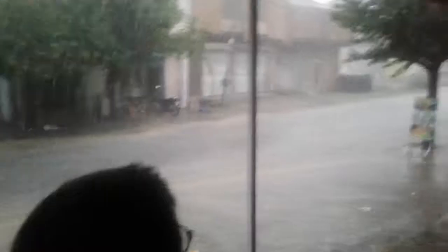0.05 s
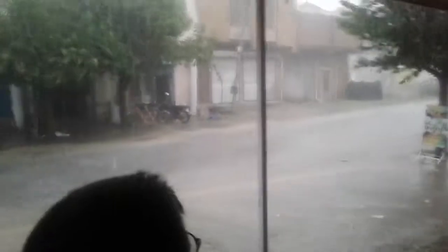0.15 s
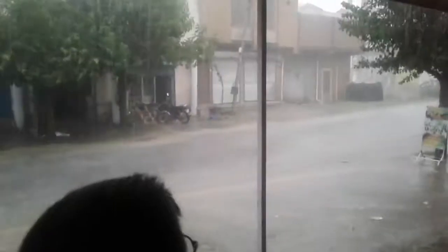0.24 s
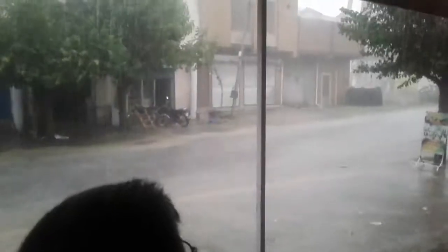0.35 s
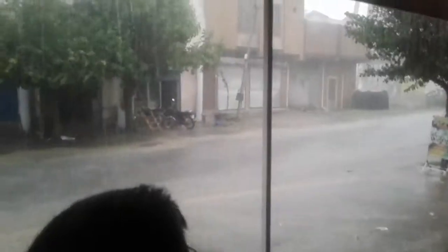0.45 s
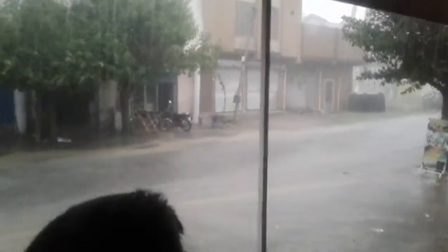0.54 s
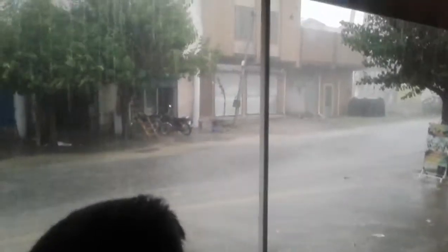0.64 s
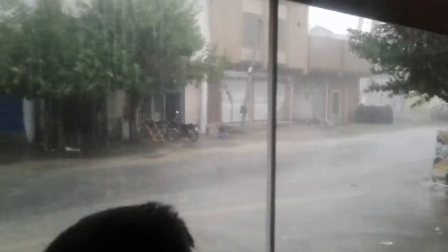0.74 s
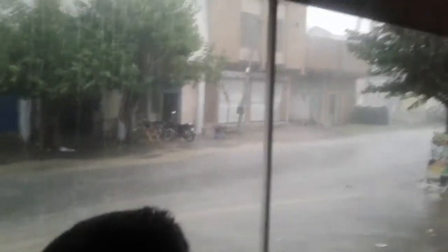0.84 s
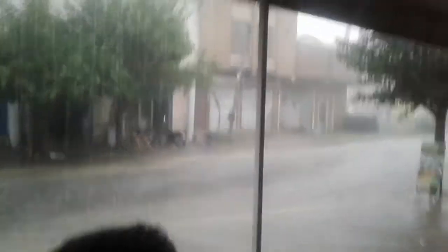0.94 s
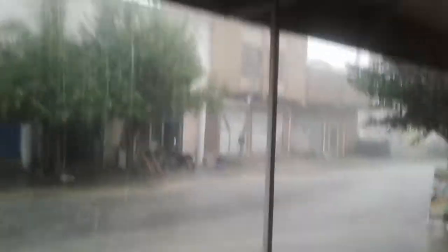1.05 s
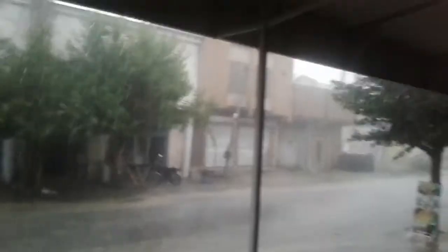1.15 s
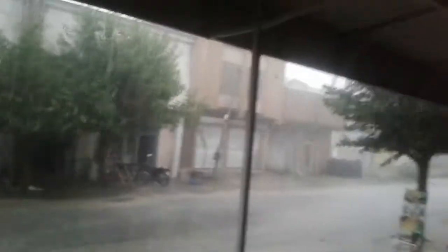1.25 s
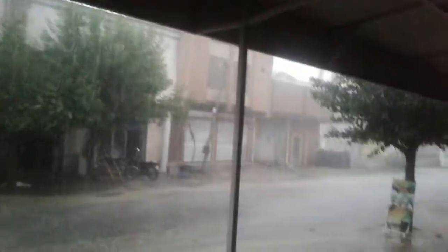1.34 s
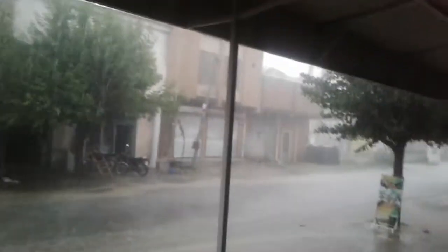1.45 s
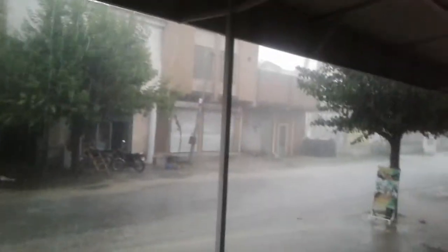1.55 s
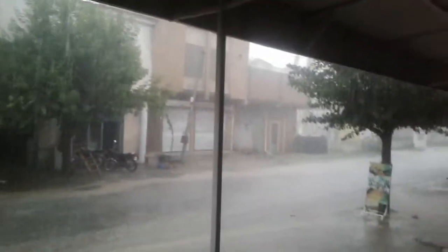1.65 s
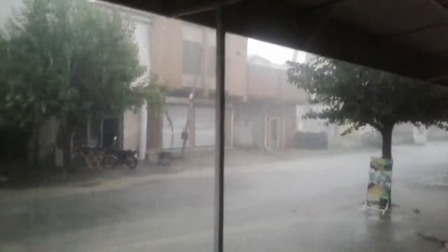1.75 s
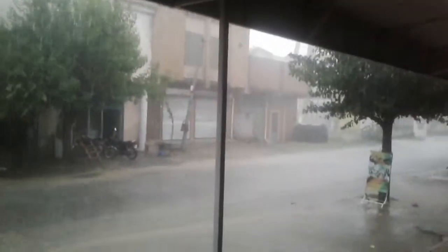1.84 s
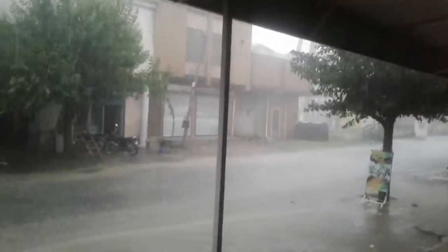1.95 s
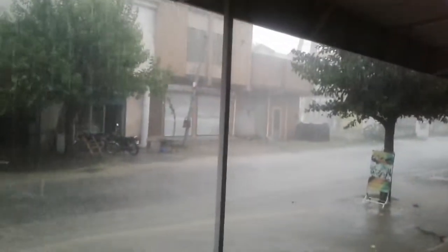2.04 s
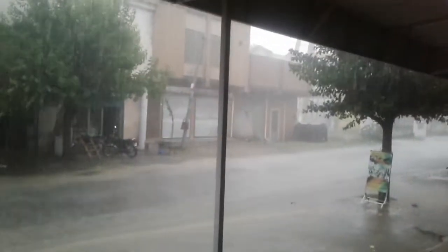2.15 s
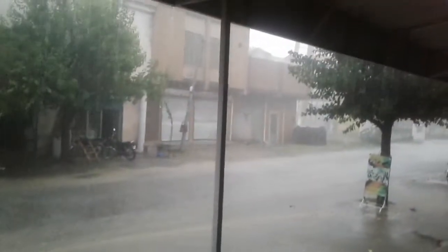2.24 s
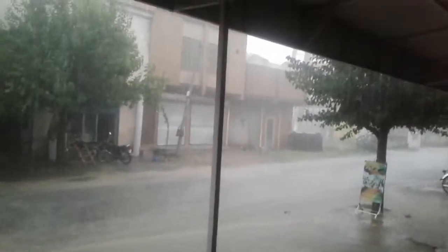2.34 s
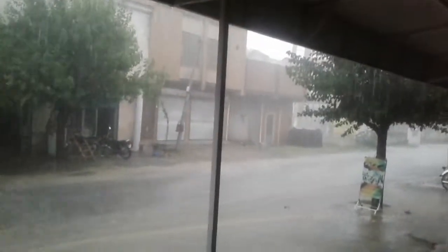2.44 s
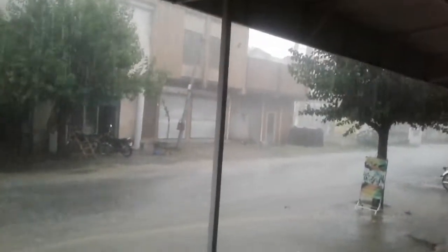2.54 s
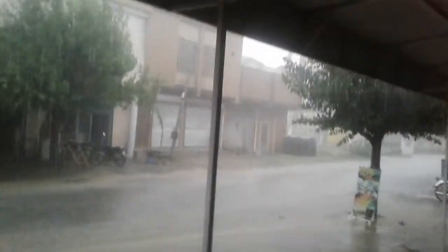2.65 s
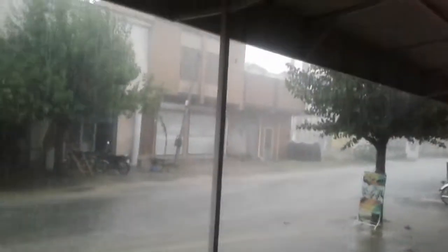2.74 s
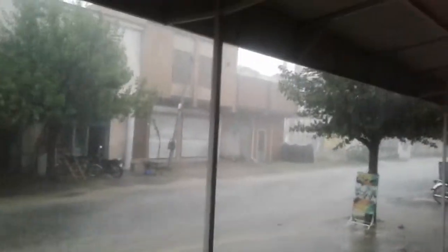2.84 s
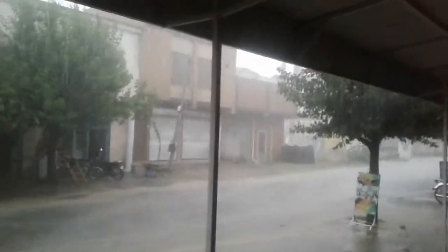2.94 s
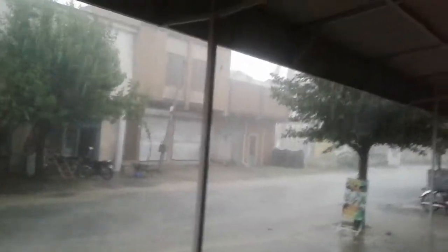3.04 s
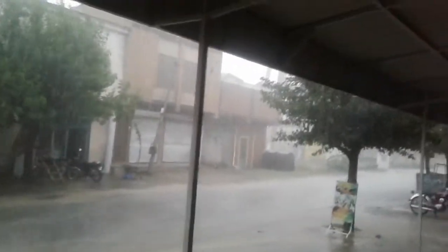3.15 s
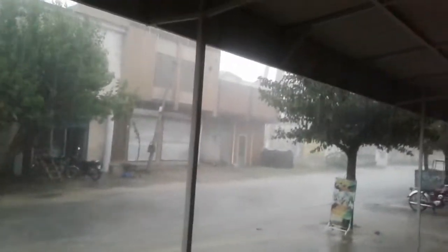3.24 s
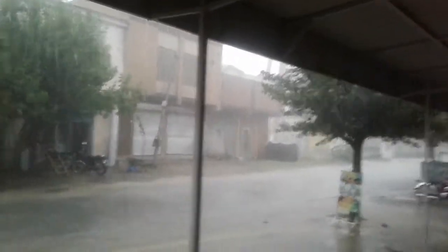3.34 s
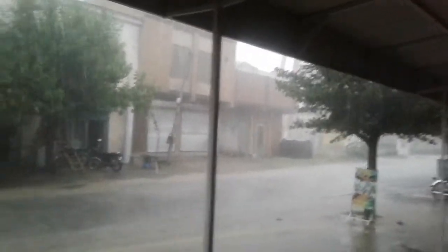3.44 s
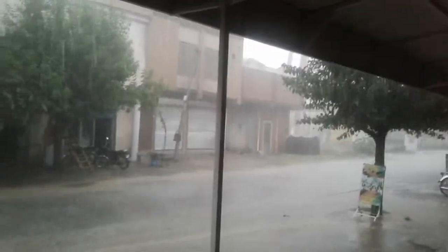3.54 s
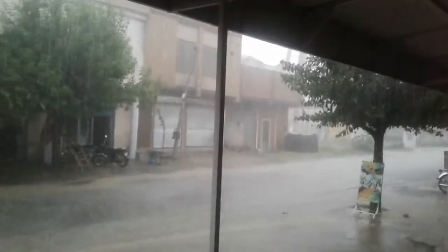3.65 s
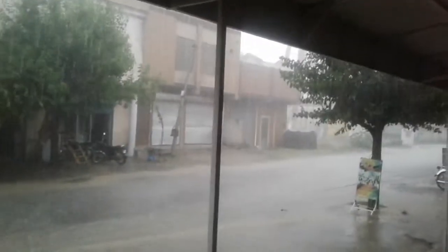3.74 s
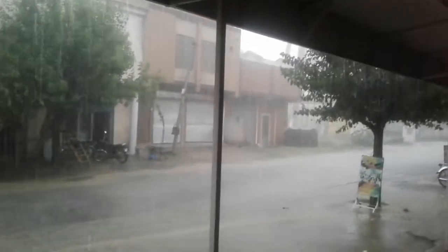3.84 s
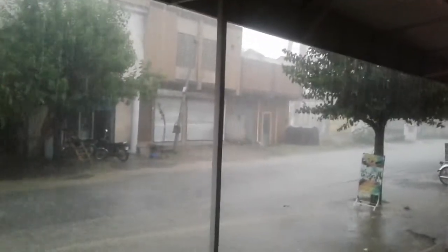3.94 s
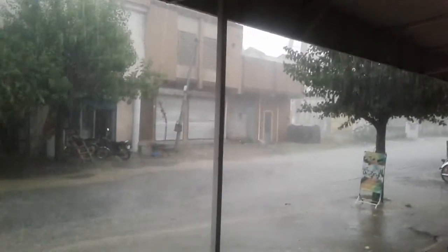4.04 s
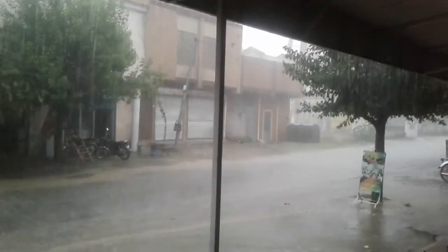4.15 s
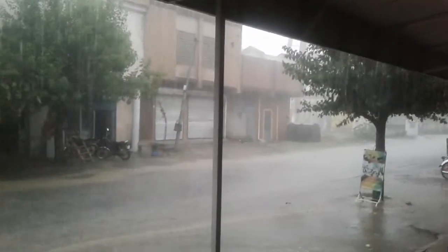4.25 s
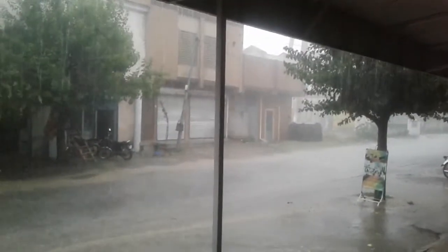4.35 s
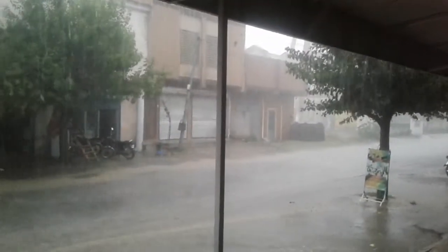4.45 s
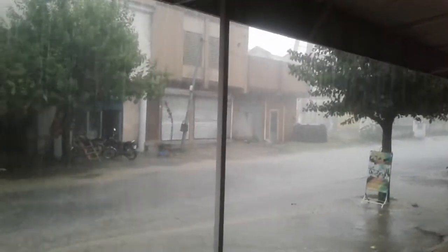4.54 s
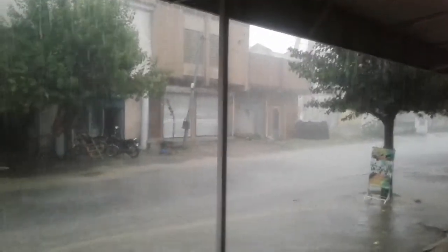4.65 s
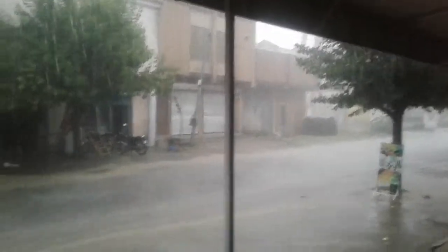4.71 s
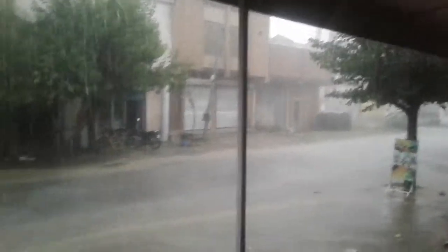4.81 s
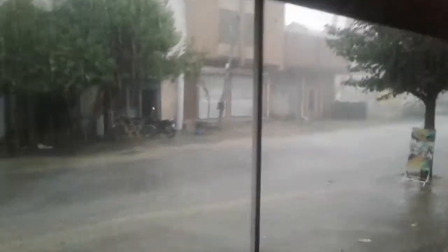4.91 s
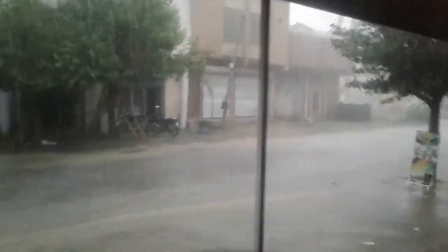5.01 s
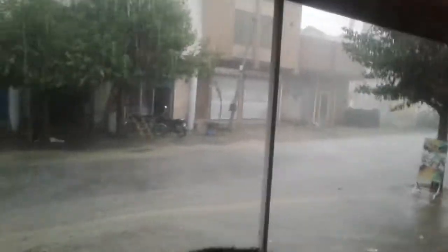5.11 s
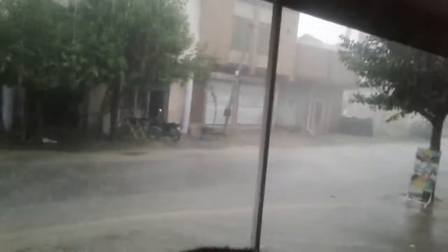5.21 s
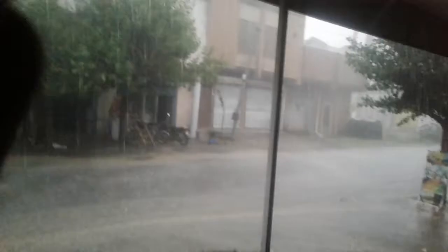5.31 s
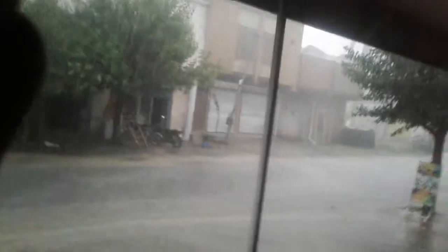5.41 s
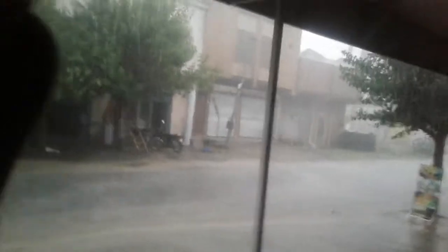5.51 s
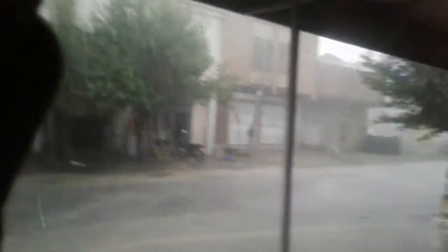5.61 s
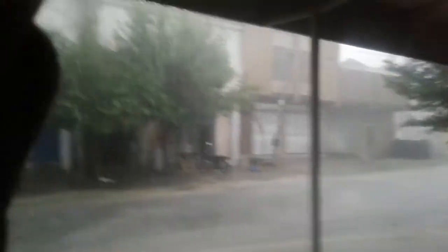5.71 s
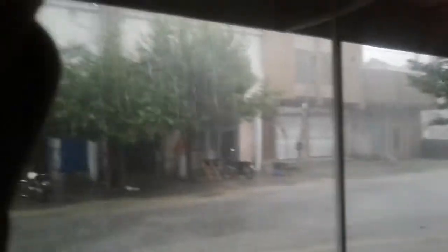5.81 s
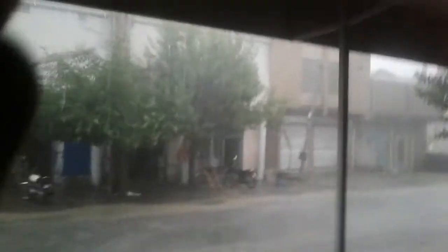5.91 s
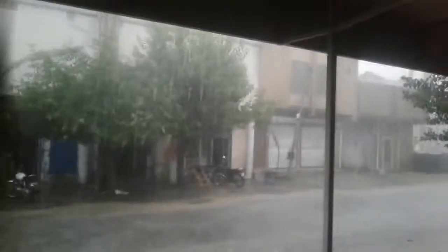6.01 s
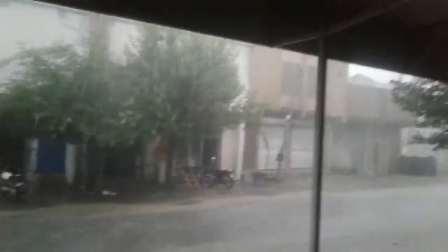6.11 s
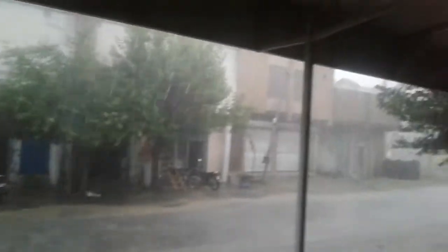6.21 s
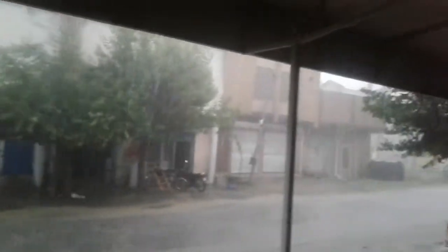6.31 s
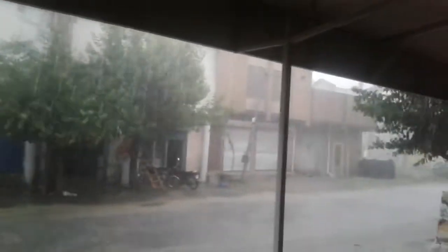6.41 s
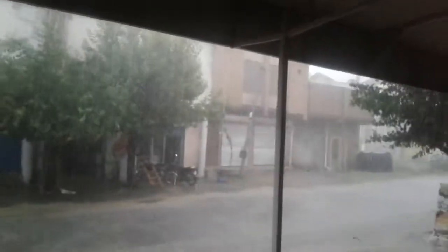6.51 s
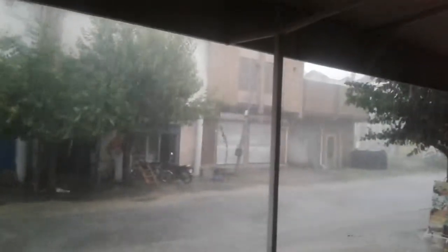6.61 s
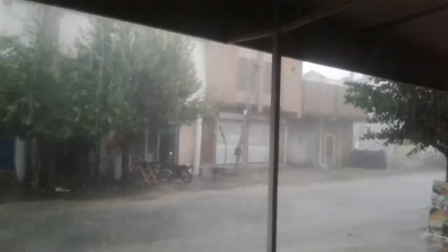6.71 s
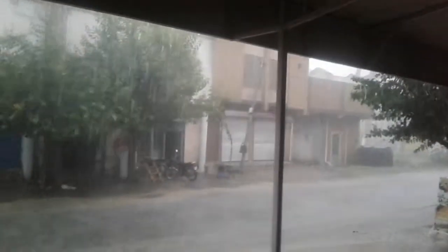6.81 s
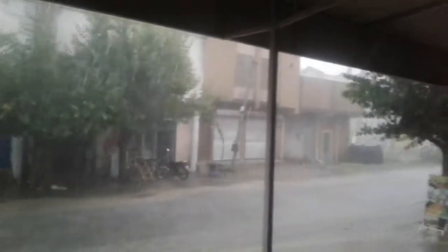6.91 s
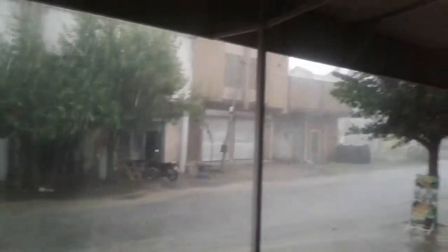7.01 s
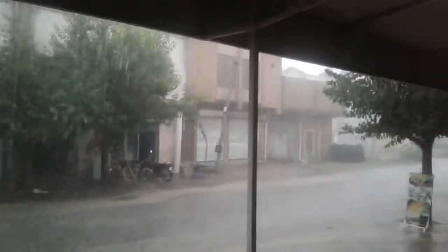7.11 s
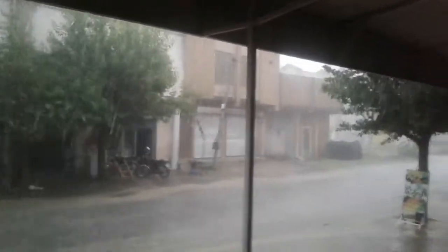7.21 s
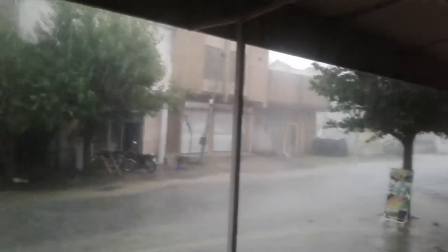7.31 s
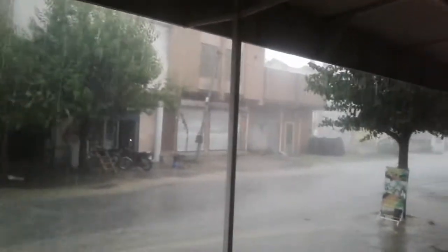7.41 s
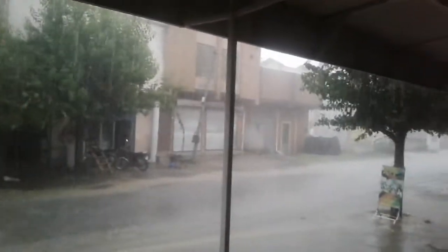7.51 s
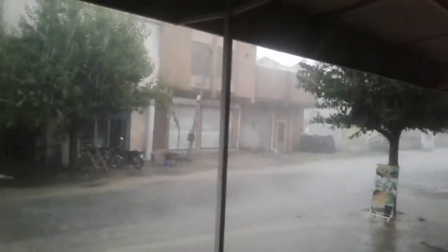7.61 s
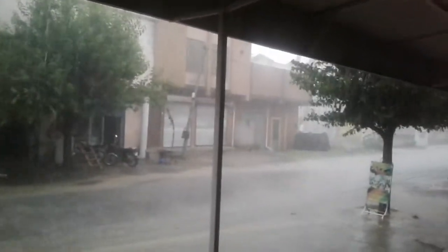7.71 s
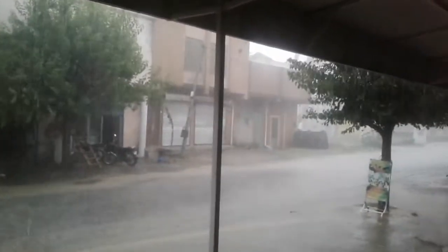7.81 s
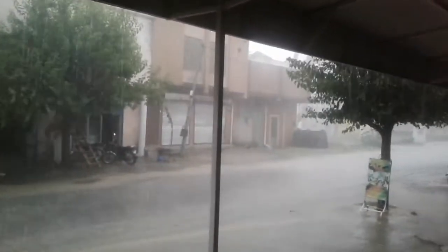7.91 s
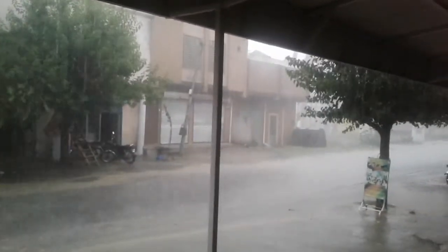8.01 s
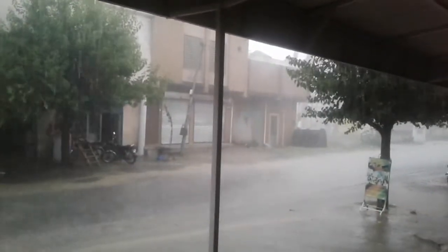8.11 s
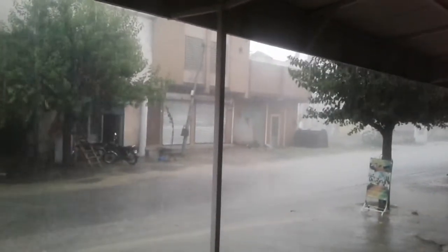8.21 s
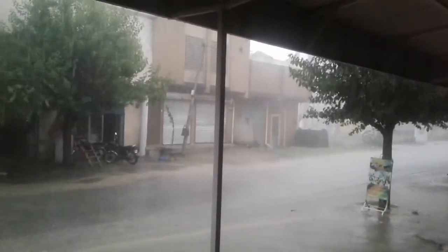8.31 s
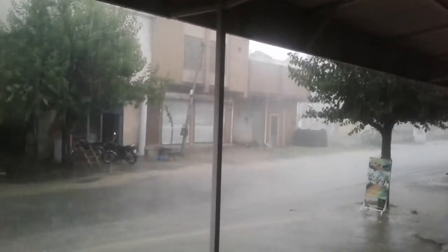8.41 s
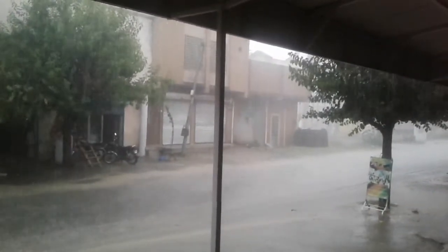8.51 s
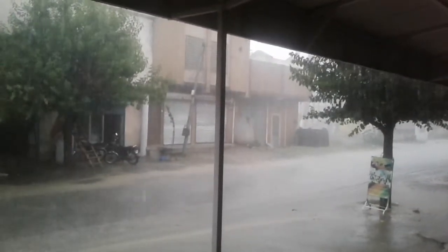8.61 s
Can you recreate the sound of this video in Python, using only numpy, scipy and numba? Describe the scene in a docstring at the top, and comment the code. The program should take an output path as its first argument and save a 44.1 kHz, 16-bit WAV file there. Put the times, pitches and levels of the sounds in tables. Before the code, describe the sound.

A torrential street downpour heard from a sheltered porch through a small hand-held microphone. Silence gives way within a fraction of a second to thick, even, slightly flickering hiss, with fine patter and light low rumble. Occasional nearby drops stand out as tiny ticks, the strongest just after five seconds, followed by a very faint low handling bump. The rain continues steadily and stops without fading.

```python
"""A downpour on a street, heard from under a sheet-roofed porch through one small hand-held microphone:
random impacts, thousands a second, merge with a noise wash into a hiss whose bands flicker in level.
Near drops are short noise bursts that stand out as ticks; a knock on the case is a damped low sine.
The microphone port, a moving resonance near 6 kHz, shifts and dulls as the hand turns it.
The sound fades in from silence."""
import sys
import numpy as np
from scipy import signal
from scipy.fft import rfft, irfft, next_fast_len
from scipy.io import wavfile
from numba import njit

SR = 44100
rng = np.random.default_rng(int(sys.argv[2]) if len(sys.argv) > 2 else 0)


def generate_wav(signal):
    """Clip the signal to [-1, 1] and save it as 16-bit WAV at the path in sys.argv[1]."""
    frames = np.transpose(np.atleast_2d(signal))
    scaled = np.clip(frames, -1, 1) * 32767
    pcm = np.round(scaled).astype(np.int16)
    wavfile.write(sys.argv[1], SR, pcm)


N = 381906

# Knocks of the hand on the case: [t/s, starting amplitude as level/dB before damping, f/Hz]
CASE_KNOCKS = [(5.37, -44, 45)]
# Heavy drops close by: [t/s, relative level/dB]
NEAR_DROPS = [(2.5451, -1), (3.045, -5), (4.6862, -4), (4.7341, 2), (4.9724, -2), (5.1997, 8), (7.0055, 0),
              (7.0628, -1)]
# Resonance of the port as the grip opens or shades it: [t/s, f/Hz, sharpness Q]
PORT_RESONANCE = [(0.68, 5940, 2), (0.95, 6230, 3.7), (4.5, 6280, 4.1), (5.35, 6230, 3.3),
                  (5.68, 5900, 3.1), (5.86, 5200, 2.9), (6.02, 5700, 3.4), (6.5, 5800, 3.06),
                  (7.6, 5960, 3), (8.66, 5930, 3)]
# Strength of the downpour: [t/s, level/dB]
RAIN_STRENGTH = [(0.68, -11), (0.94, -12), (2.32, -12.5), (2.52, -11), (2.66, -12.5), (3.05, -13.5),
                 (3.25, -13.5), (3.88, -14.5), (4.12, -12.5), (4.3, -15), (4.8, -13.5), (5.1, -11.5),
                 (5.5, -13.5), (6.17, -13.7), (6.41, -11.5), (7.08, -12.5), (7.39, -11.5), (7.9, -12.5),
                 (8.66, -13.5)]
# Spectral density of the rain before the resonances lift it: [f/Hz, relative level/dB]
RAIN_SPECTRUM = [(25, -44), (70, -30), (115, -12), (190, -11), (380, -8.5), (750, -3.5), (1900, 0),
                 (2500, -1.5), (3800, -1.5), (4600, -1.5), (5600, -4.5), (7500, -2), (10000, -0.5),
                 (12500, 3.5), (15700, 12)]
# Resonances, the low ones of the porch, the last of the microphone mesh: [f/Hz, width/Hz, lift as level/dB]
RESONANCES = [(127, 30, 2.5), (241.4, 44, 5), (303, 41, 5), (444, 48, 6), (554, 67, 4.5), (6700, 1200, 2.5)]
# Bell-shaped regions of rumble, patter, spray and top air: [centre f/Hz, width/octaves]
SPECTRAL_REGIONS = [(150, 1.4), (4000, 0.46), (12000, 0.38), (16400, 0.21)]
# Slow swings of the regions: [t/s, rumble level/dB, patter level/dB, spray level/dB, top air level/dB]
REGION_SWINGS = [(0.68, 0, -3, -6.5, -4), (0.87, 4, -2.5, -2.5, -5), (0.98, 1, -1.5, 1, 1),
                 (2.1, 1.5, -1, 2, -1), (3.1, -1.5, -1, -0.5, 0), (4.4, 1.5, -.5, 2.5, -1),
                 (5.3, -1.5, 1, .5, 0), (5.55, -0.5, -0.5, -2, 1), (5.84, 0, 1, 2, -5),
                 (6.1, 0.5, .5, -1, 2), (7.6, 0, 1.5, -1.5, 2), (8.66, -1.5, 1, -1, .5)]

# drop rate, mean of the random drop level before its cap, and share of far rain in the power
DROPS_PER_S, DROP_SPREAD_DB, FAR_SHARE = 4000, 2, 0.65
FADE_FROM_S, FADE_TO_S, FADE_FIRST_GAIN = 0.39, 0.66, 0.0078
PEAK_LIMIT = 0.84   # amplitude the rounded peaks approach
CUTOFF_HZ = 15750


def from_db(db):
    """Definition of level: twenty decibels are a factor of ten in amplitude."""
    return 10 ** (np.asarray(db) / 20)


def rms_one(x):
    """Normalisation: a signal divided by its root mean square has unit power."""
    return x / np.sqrt(np.mean(x ** 2) + 1e-20)


def in_time(rows):
    """Linear interpolation: each column becomes a curve with one value per sample."""
    s, *columns = np.transpose(rows)
    return [np.interp(np.arange(N) / SR, s, column) for column in columns]


def drift(corner_hz):
    """Low-pass filtered noise: two equal poles leave a slow random motion of rms 1."""
    step, run_in = 40, 2000   # samples of sound per slow value; slow values discarded
    pole = np.exp(-2 * np.pi * corner_hz * step / SR)
    noise = rng.standard_normal(N // step + run_in + 2)
    slow = signal.lfilter([1], [1, -2 * pole, pole ** 2], noise)[run_in:]
    return np.interp(np.arange(N) / step, np.arange(len(slow)), rms_one(slow))


def bumps():
    """Damped oscillation: a knock makes the case swing at a low frequency and die away exponentially."""
    out, t = np.zeros(N), np.arange(4000) / SR
    decay_s = 0.008
    for s, start_db, hz in CASE_KNOCKS:
        at = round(s * SR)
        swing = np.sin(2 * np.pi * hz * t) * np.exp(-t / decay_s)
        out[at:at + len(t)] += from_db(start_db) * swing
    return out


def ticks():
    """Impulsive excitation: each near drop is a thin noise burst decaying within a few milliseconds."""
    out, t = np.zeros(N), np.arange(800) / SR
    decay_s, thin_above_hz = 0.002, 1500
    bursts = rng.standard_normal((len(NEAR_DROPS), len(t)))
    for (s, level_db), burst in zip(NEAR_DROPS, bursts):
        at = round(s * SR)
        out[at:at + len(t)] += from_db(level_db - 15) * burst * np.exp(-t / decay_s)
    high_pass = signal.butter(2, thin_above_hz, "high", fs=SR, output="sos")
    return signal.sosfilt(high_pass, out)


@njit
def cavity(x, g, damping):
    """Cavity resonance: a two-pole low-pass whose centre and damping move sample by sample."""
    out = np.zeros(len(x))
    band_state = low_state = 0.0
    for i in range(len(x)):
        band = (band_state + g[i] * (x[i] - low_state)) / (1 + g[i] * (g[i] + damping[i]))
        low = low_state + g[i] * band
        band_state, low_state = 2 * band - band_state, 2 * low - low_state
        out[i] = low
    return out


def drops():
    """Shot noise: impacts of unequal size at random moments add to the smooth wash of far rain."""
    size_db = DROP_SPREAD_DB * np.minimum(rng.exponential(1, N), 5)
    sizes = from_db(size_db) * rng.choice([-1, 1], N)
    landed = rng.random(N) < DROPS_PER_S / SR
    impacts = rms_one(sizes * landed)
    wash = rng.standard_normal(N)
    return np.sqrt(1 - FAR_SHARE) * impacts + np.sqrt(FAR_SHARE) * wash


def downpour(regions_db, together_db, patchy_db):
    """Band modulation: sheets of rain move all third-octave slices together; each also flickers alone."""
    size = next_fast_len(N)
    bins_hz = np.maximum(np.fft.rfftfreq(size, 1 / SR), 10)
    octave = np.log2(bins_hz)

    lift_db = sum(db / (1 + (2 * (bins_hz - mode_hz) / width_hz) ** 2)
                  for mode_hz, width_hz, db in RESONANCES)
    hz, level_db = np.transpose(RAIN_SPECTRUM)
    colour_db = np.interp(octave, np.log2(hz), level_db) + lift_db
    coloured = rfft(drops(), size) * from_db(colour_db)

    out, sheets_db = 0, together_db * drift(28.0)
    for centre in np.arange(12, 44) / 3:   # log2 of the centre frequency
        # overlapping slices sum to one
        window = np.cos(np.pi * np.clip(1.5 * (octave - centre), -.5, .5)) ** 2
        reach = [np.exp(-.5 * ((centre - np.log2(mid_hz)) / width) ** 2)
                 for mid_hz, width in SPECTRAL_REGIONS]
        gain_db = np.dot(reach, regions_db) + sheets_db + patchy_db * drift(8.4)
        band = irfft(coloured * window, size)[:N]
        out = out + from_db(gain_db) * band
    return out


def scene():
    """Superposition: rain and ticks pass the port, case knocks bypass it; both channels are equal."""
    rain_db, = in_time(RAIN_STRENGTH)
    port_hz, sharpness = in_time(PORT_RESONANCE)
    rain = from_db(rain_db) * downpour(in_time(REGION_SWINGS), together_db=0.51, patchy_db=.5)
    through_port = cavity(rain + ticks(), np.tan(np.pi * port_hz / SR), 1 / sharpness)
    heard = through_port + bumps()
    return np.array([heard, heard])


def record(dry):
    """Saturation and band limiting: silence, a straight fade-in, rounded high peaks, then a steep low-pass."""
    t = np.arange(N) / SR
    fade = np.interp(t, [FADE_FROM_S, FADE_TO_S], [FADE_FIRST_GAIN, 1], left=0)
    faded = dry * fade
    rounded = faded / (1 + (faded / PEAK_LIMIT) ** 8) ** .125
    low_pass = signal.ellip(14, .5, 80, CUTOFF_HZ, fs=SR, output="sos")   # ripple and stopband in dB
    return signal.sosfilt(low_pass, rounded)


dry = scene()
out = record(dry)
generate_wav(out)
```